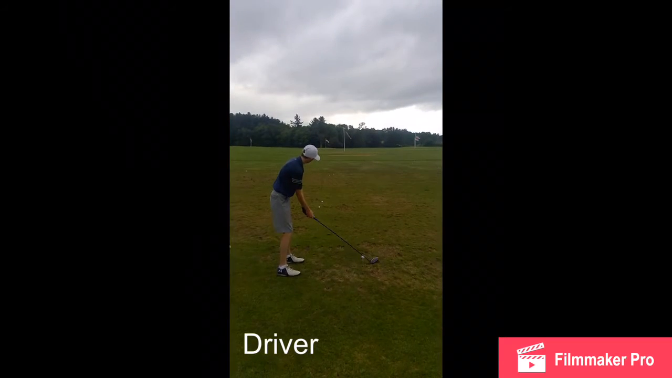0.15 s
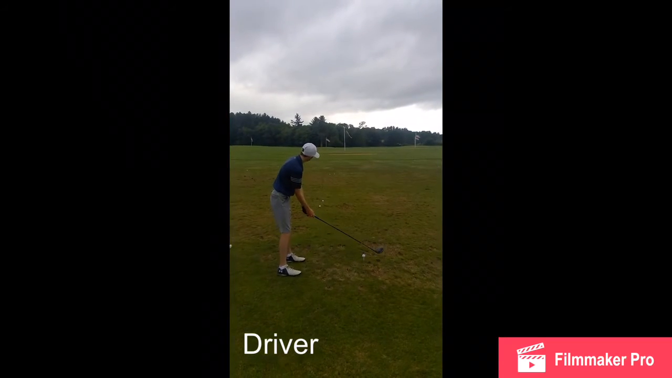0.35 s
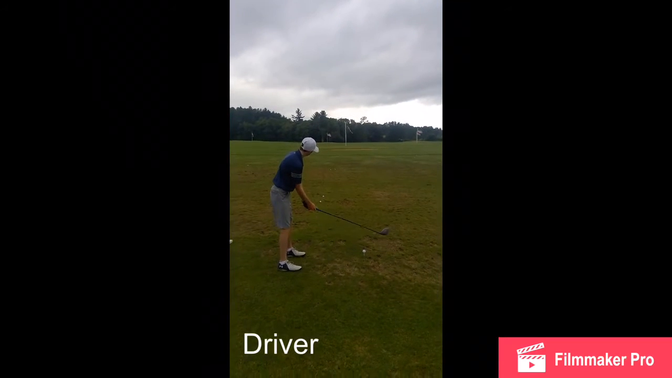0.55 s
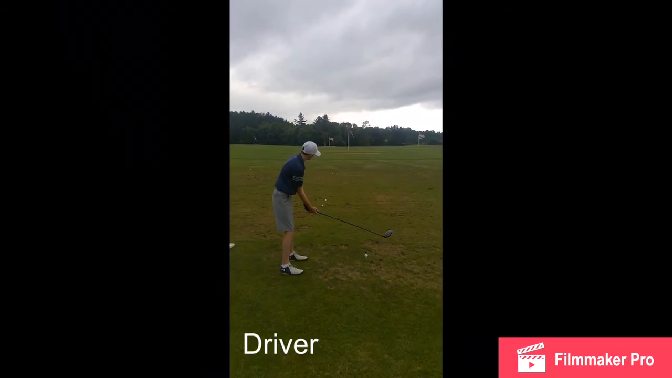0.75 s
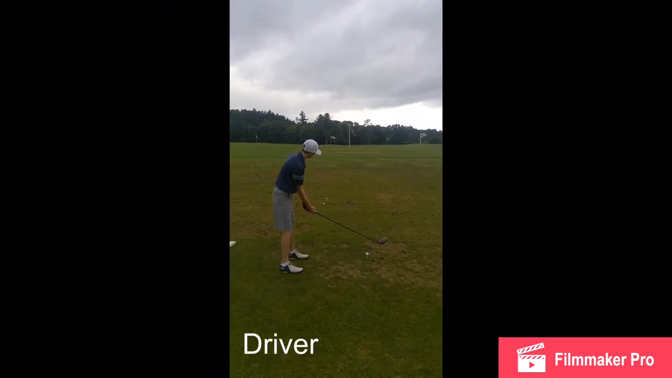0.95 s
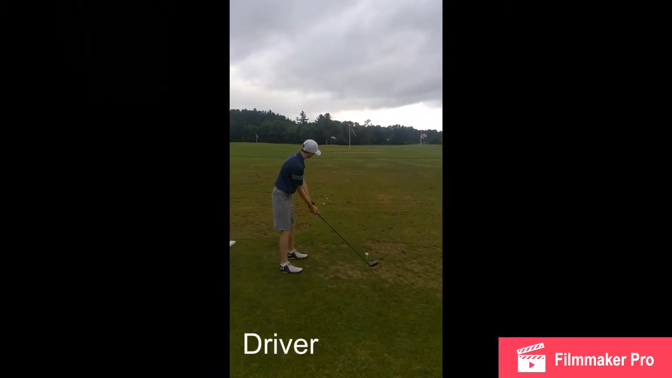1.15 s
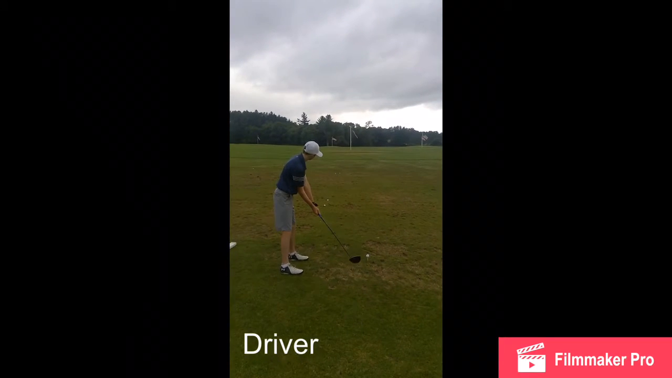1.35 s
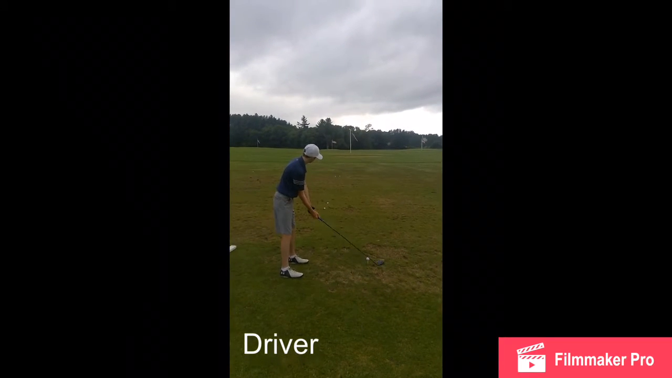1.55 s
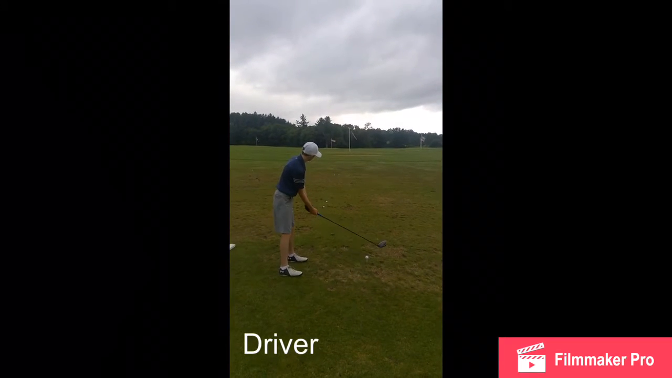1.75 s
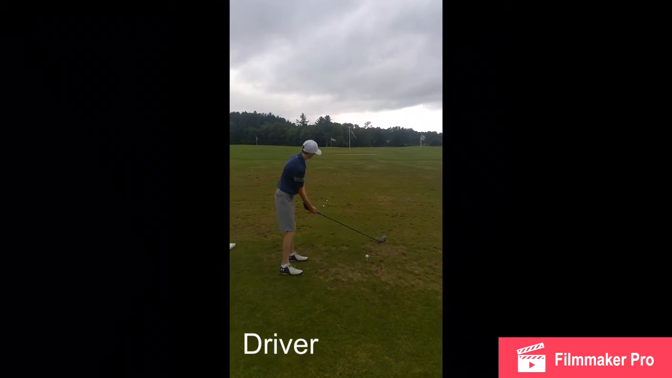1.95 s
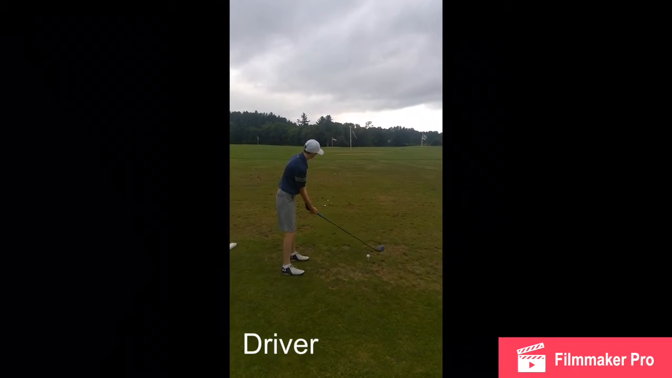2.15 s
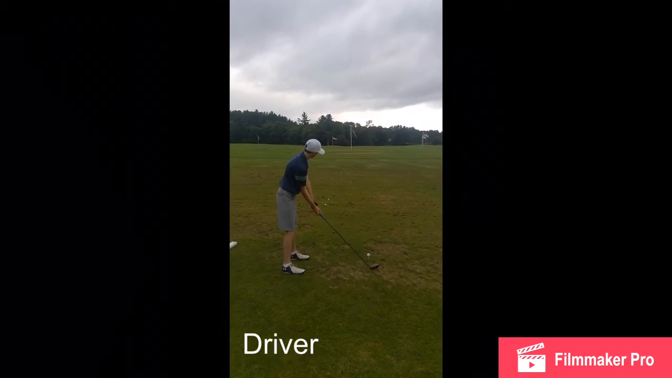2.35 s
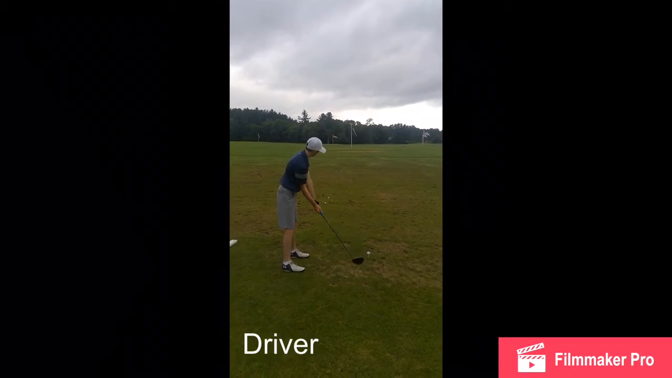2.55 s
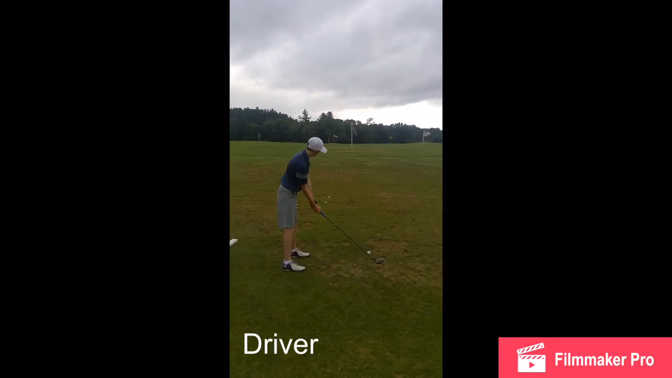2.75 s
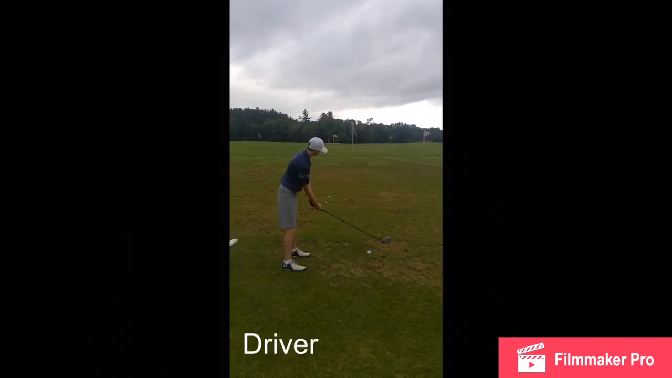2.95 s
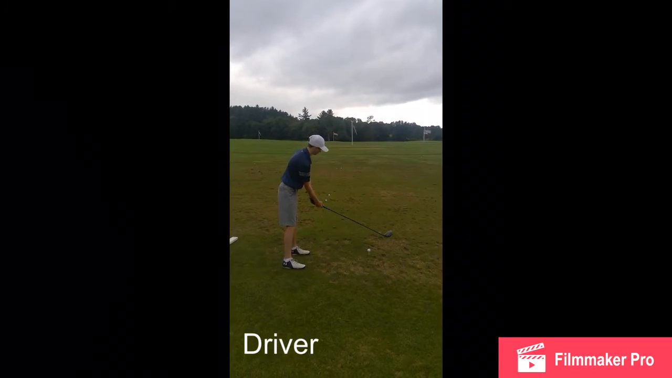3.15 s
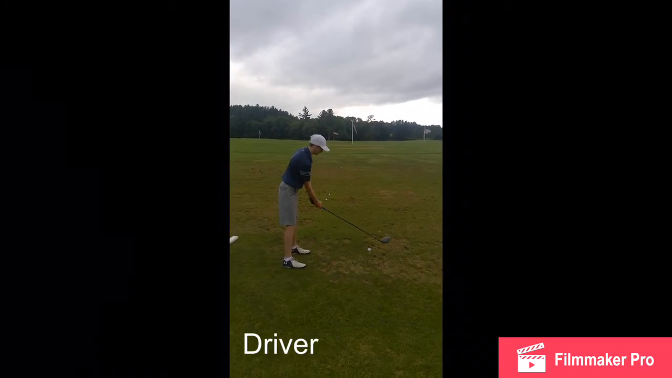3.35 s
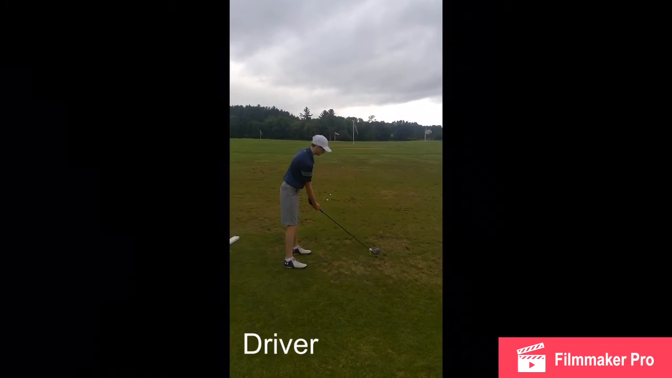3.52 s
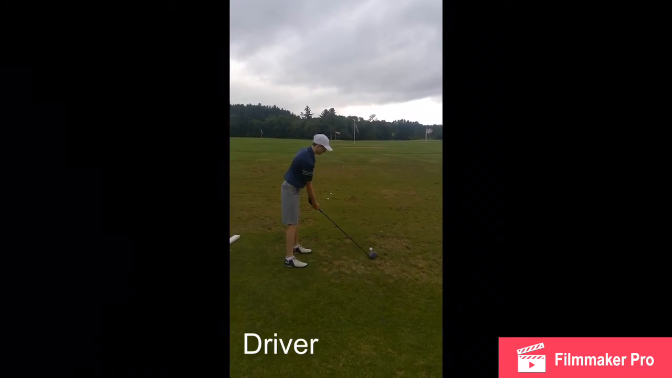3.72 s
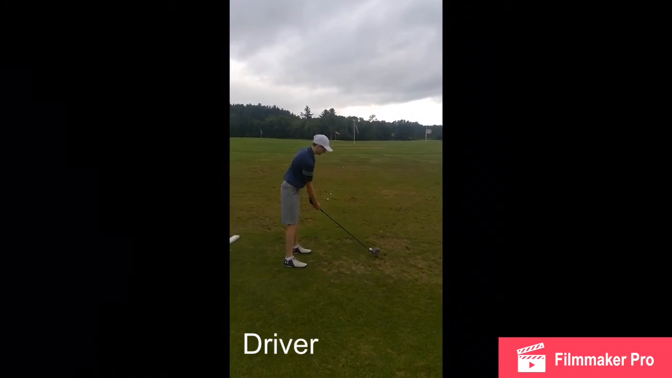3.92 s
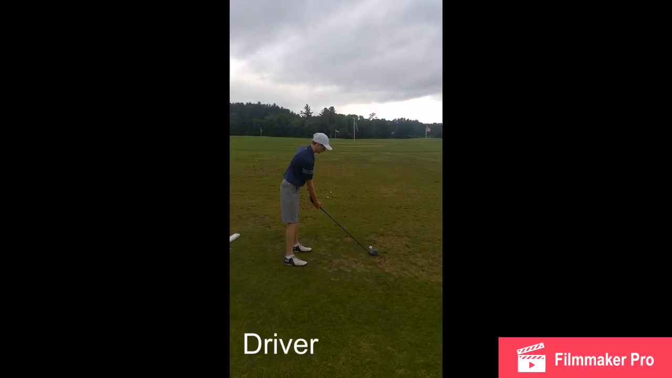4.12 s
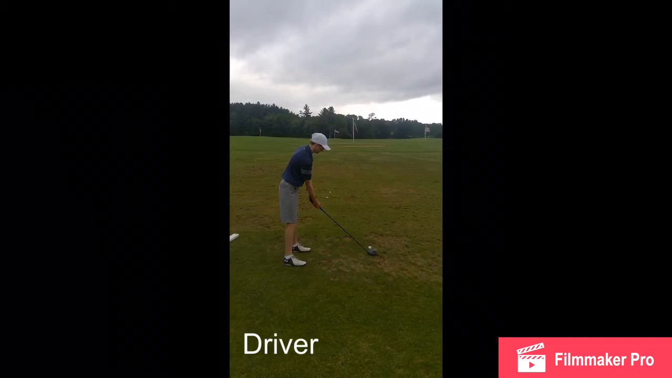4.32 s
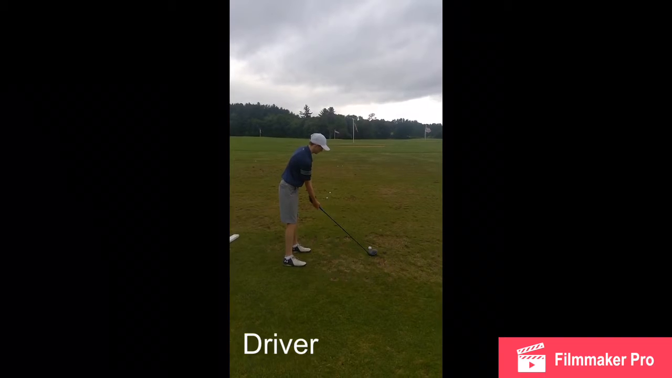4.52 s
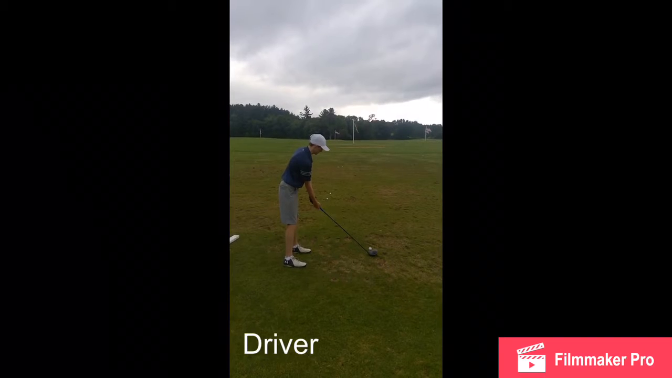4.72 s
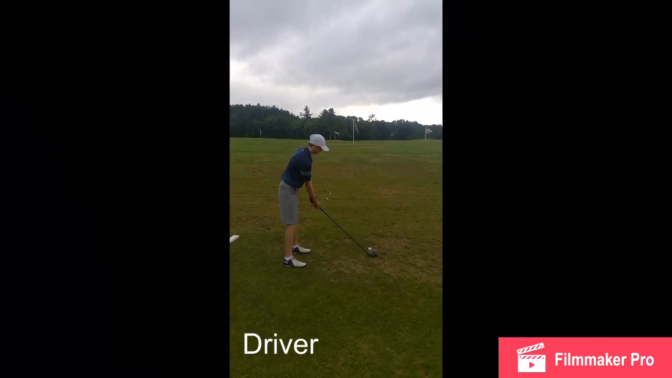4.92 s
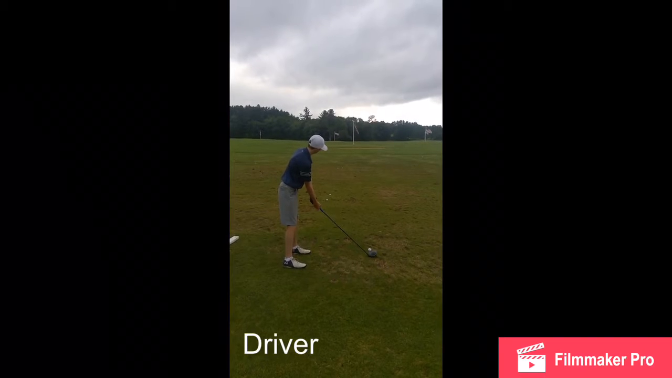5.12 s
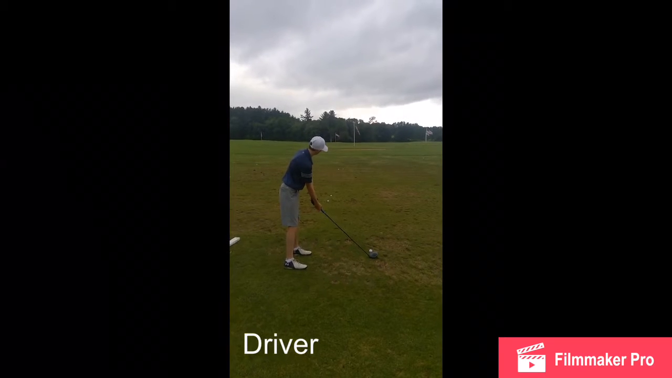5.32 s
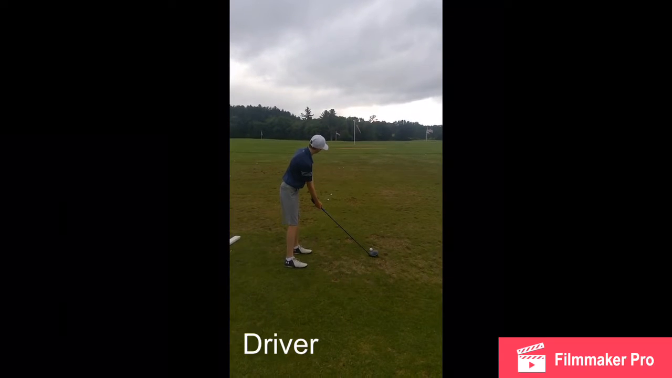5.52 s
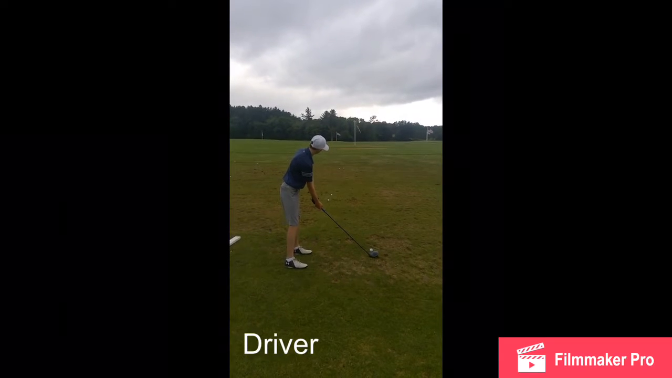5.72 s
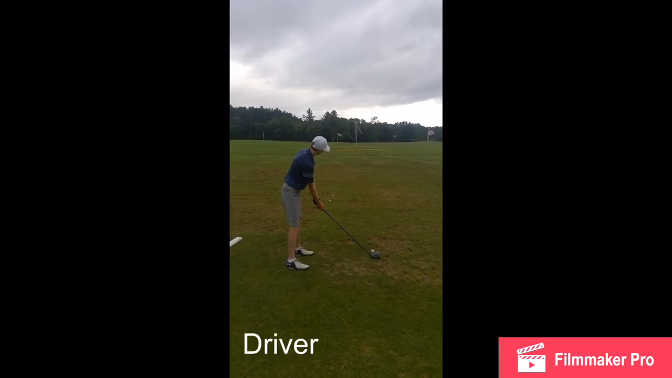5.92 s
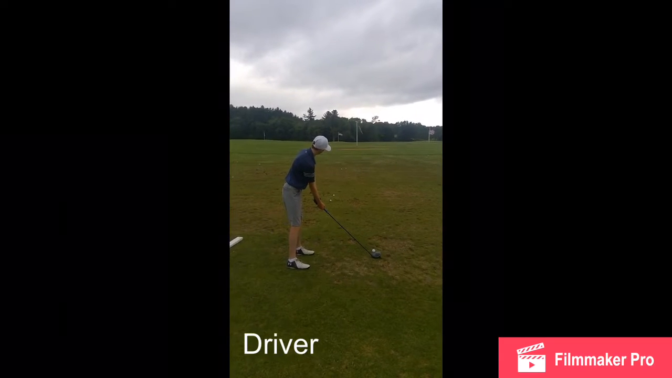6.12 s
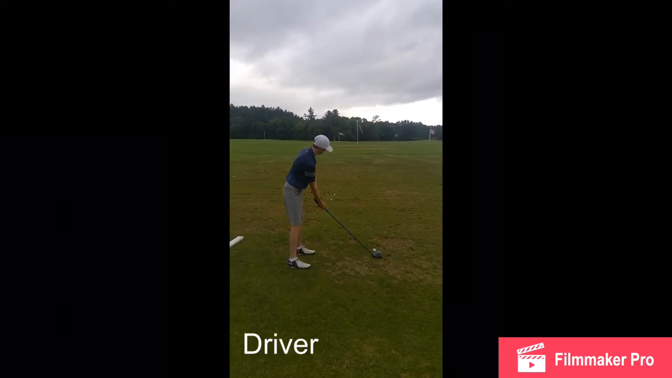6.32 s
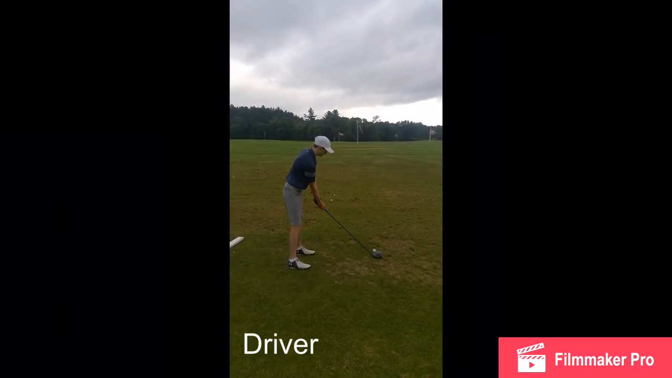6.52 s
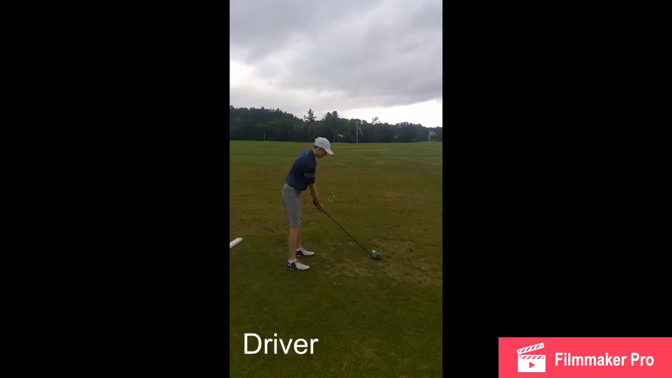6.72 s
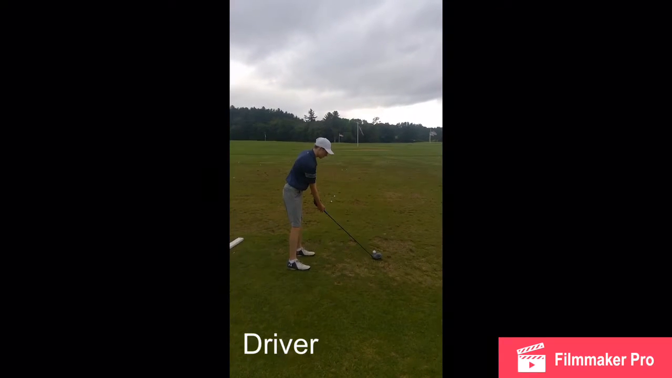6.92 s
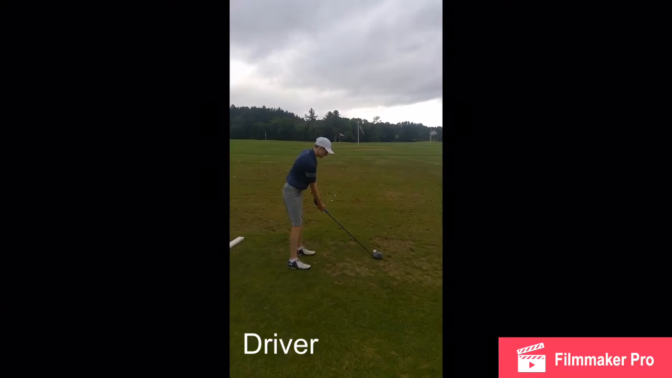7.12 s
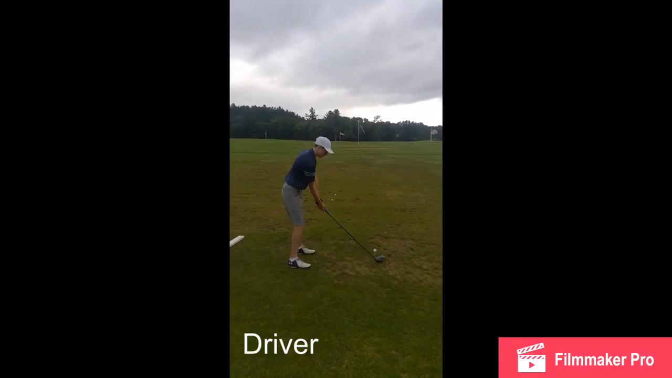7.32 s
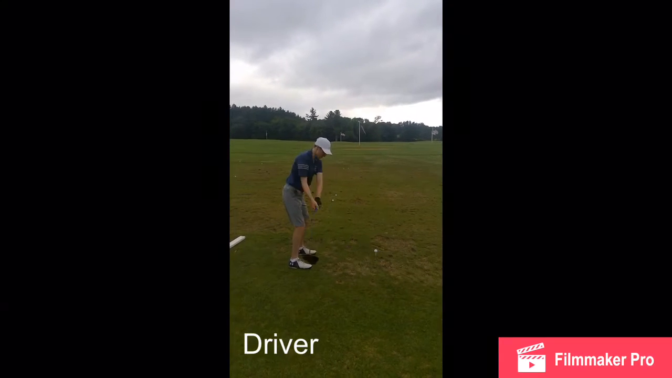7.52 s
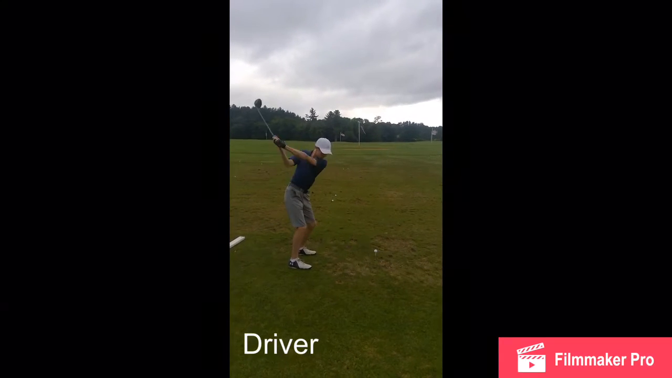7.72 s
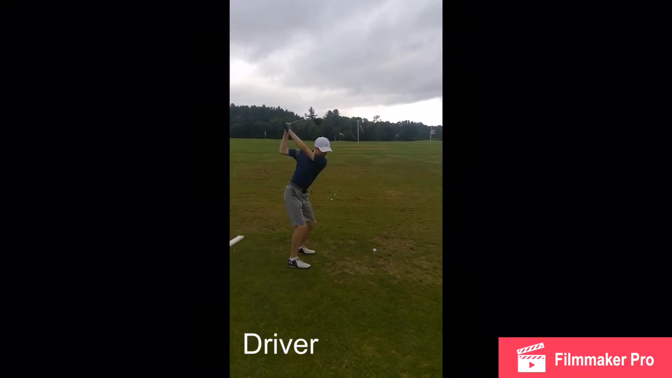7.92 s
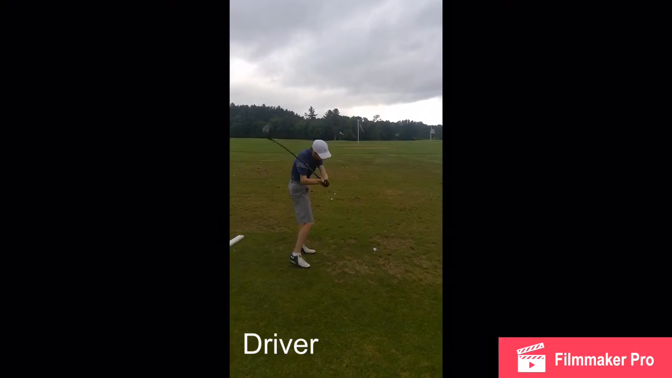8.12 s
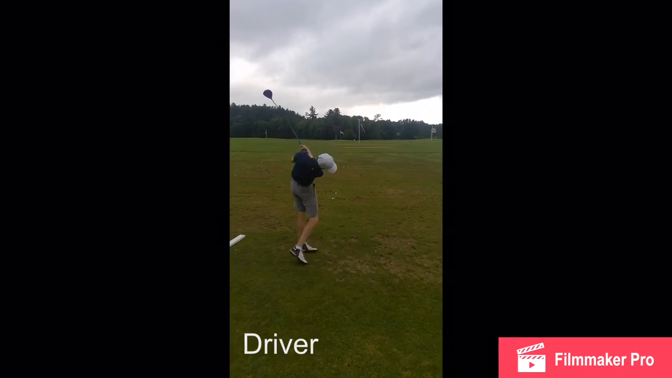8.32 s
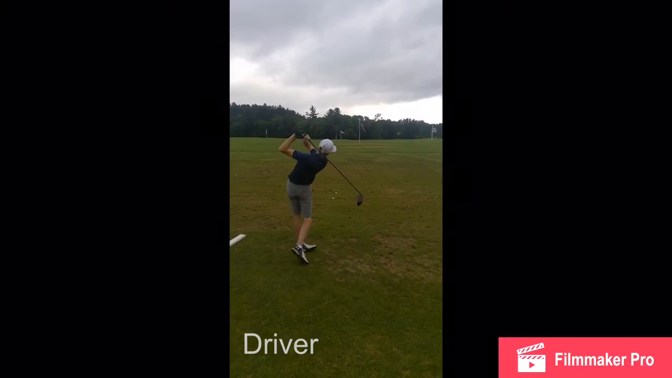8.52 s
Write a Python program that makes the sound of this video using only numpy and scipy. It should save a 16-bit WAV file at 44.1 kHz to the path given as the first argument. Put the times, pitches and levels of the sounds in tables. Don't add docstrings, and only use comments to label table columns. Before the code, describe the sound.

Breezy field air, small bird chirps and dull turf thuds for eight seconds, until a golf driver whooshes down and cracks hard against the ball.

```python
import sys
import numpy as np
from scipy import signal
from scipy.io import wavfile

SR = 44100
rng = np.random.default_rng(int(sys.argv[2]) if len(sys.argv) > 2 else 0)


def gain_from_db(level_db):
    decades = np.asarray(level_db, float) / 20
    return 10 ** decades


def generate_wav(signal):
    frames = np.transpose(np.atleast_2d(signal))
    scaled = np.clip(frames, -1, 1) * 32767
    pcm = np.round(scaled).astype(np.int16)
    wavfile.write(sys.argv[1], SR, pcm)


N = 377496
TIME = np.arange(N) / SR

# frequency in Hz, level in dB per Hz.
AIR_SPECTRUM = [(59, -33), (100, -9.5), (129, -13), (210, -2), (244, -10.5), (328, -12), (424, -12),
                (471, -19), (1010, -15.5), (1230, -19.5), (4020, -25.5), (6700, -35), (11000, -40.5),
                (16000, -54)]
# frequency in Hz, correlation from -1 to 1.
AIR_LIKENESS = [(60, 0.94), (130, -0.18), (290, 1), (640, 0.69), (1410, 0.2), (3100, 0.15), (6820, 0.6),
                (15000, 0.3)]
# time in seconds, level in dB.
TRAFFIC = [(0, -72.5), (.2, -68.5), (.7, -65), (1.24, -73), (2.5, -66.5), (2.95, -72), (3.74, -67.5),
           (4.07, -73), (4.65, -67.5), (5.0, -76.5), (5.29, -63), (5.6, -70), (6.5, -70), (7.4, -67),
           (7.75, -66.5), (8.56, -57)]
# peak in seconds, half length in seconds, level in dB,
# rumble over gust in dB, left minus right in dB.
BUFFETS = [(0.165, 0.28, -64, -23, -4), (1.576, 0.22, -56.5, 1, 0.5), (2.077, 0.17, -54.5, -2.5, -20.5),
           (4.14, 0.24, -67, -1, 1), (5.1, 0.25, -63.5, -19, 4.5), (5.557, 0.044, -59, -15.5, 9.5),
           (5.992, 0.2, -71.5, -7.5, 11.5), (7.156, 0.087, -67.5, 8.5, 7.5), (7.547, 0.1, -66.5, -12, -12),
           (8.226, 0.099, -55, 16.5, -9), (8.369, 0.18, -49.5, -0.5, 0.5)]
ENGINE_HZ, ENGINE_DB = 73.6, 7
BREEZE_DB, RUMBLE_DB, AIR_DB = -69.5, -7.5, -79.5

# start in seconds, length in seconds, frequency in Hz, slide in Hz, level in dB.
COOS = [(0.064, 0.017, 1476, 80, -78), (2.305, 0.043, 1696, -41, -72.5), (2.371, 0.056, 1725, -59, -75.5),
        (2.689, 0.072, 1531, 18, -71.5), (2.782, 0.071, 1836, -91.5, -81.5), (3.343, 0.024, 1525, 18, -76),
        (3.656, 0.01, 1570, 1.5, -72), (4.73, 0.087, 1703, -140, -76.5), (6.623, 0.039, 1724, -240, -79),
        (6.673, 0.053, 1440, 181, -74), (7.087, 0.03, 1172, -8, -72.5), (7.228, 0.032, 1897, -370, -62.5),
        (7.691, 0.04, 1185, -1, -77), (7.745, 0.032, 1403, 32.5, -74.5), (7.787, 0.039, 1520, 130, -70.5)]
# start in seconds, length in seconds, frequency in Hz, level in dB.
CHIPS = [(.94, 0.017, 4960, -82.5), (1.085, 0.017, 3980, -71), (1.781, 0.037, 4580, -62.5),
         (3.0, .011, 3580, -72.5), (3.48, .03, 5130, -83.5), (4.352, 0.018, 4850, -64.5),
         (4.553, .018, 3010, -76), (4.665, .014, 5680, -70), (4.667, 0.0087, 3610, -59.5),
         (4.74, 0.017, 5630, -70.5), (6.285, 0.037, 6820, -81), (6.442, 0.021, 4640, -57.5),
         (6.444, 0.02, 9200, -83), (8.152, 0.01, 3750, -52.5)]
# start in seconds, length in seconds, frequency in Hz, level in dB.
BUZZES = [
    (1.08, 0.035, 6700, -83.5),
    (2.201, 0.044, 5730, -82),
    (6.282, .067, 4480, -75.5),
]
# start in seconds, length in seconds, frequency in Hz, slide in Hz, level in dB.
STRANDS = [(1.097, .025, 5180, 99, -80.5), (1.102, 0.034, 6600, 2, -83), (1.133, 0.012, 4200, 599, -62.5),
           (2.255, 0.011, 4100, 798, -47.5), (4.403, 0.011, 4200, 749, -55),
           (6.342, 0.013, 4180, 749, -56.5), (3.94, 0.19, 5180, -180, -75),
           (3.941, 0.13, 4560, 148.5, -75.5), (3.944, 0.091, 5500, 59, -79.5),
           (4.006, 0.028, 6130, 0.5, -88), (4.212, .06, 6130, -78, -93), (4.26, 0.037, 4040, 299.5, -86.5),
           (7.001, .065, 4970, 0, -75), (7.04, 0.058, 4650, -120, -81.5), (7.06, 0.058, 5300, 0, -85),
           (7.06, 0.046, 4920, -49, -81.5), (7.218, .03, 4950, 120, -90), (4.83, 0.084, 2640, 50, -76)]
# start in seconds, length in seconds, frequency in Hz, level in dB.
PIPES = [
    (1.86, .027, 3590, -82),
    (2.731, 0.021, 6260, -74.5),
    (4.347, 0.026, 6070, -79),
]
# start in seconds, length in seconds, frequency in Hz,
# slide in Hz, level in dB.
SWOOPS = [(2.141, 0.2, 4210, 351.5, -72.5), (2.392, 0.064, 5090, 66, -74), (4.297, 0.046, 4330, -100, -86),
          (4.73, 0.047, 4410, 448, -65), (4.755, 0.053, 4520, -23.5, -68), (4.724, 0.063, 3950, 229, -64.5),
          (4.752, 0.034, 3020, 380.5, -57.5), (4.765, .06, 3317, -32, -55), (4.774, 0.071, 3114, -200, -55),
          (5.42, .05, 4160, -560, -90), (5.47, 0.069, 3620, -450, -84), (5.447, .035, 3250, -250, -85),
          (5.481, 0.043, 3000, -56.5, -79), (5.738, 0.057, 3190, -280, -81.5),
          (5.768, 0.045, 2840, -19, -77), (5.986, .03, 3460, -230, -79), (6.036, .045, 2885, -250, -86)]
# start in seconds, length in seconds, frequency in Hz, level in dB.
CHIRPS = [(2.29, 0.023, 2590, -78), (2.34, 0.048, 2600, -77.5), (2.38, 0.087, 3495, -57.5),
          (5.155, 0.067, 2960, -85), (5.794, .013, 2350, -73), (5.85, .025, 3400, -86),
          (5.895, .032, 3000, -80), (6.03, 0.023, 3400, -83), (7.36, .075, 3500, -81.5),
          (7.79, 0.049, 3500, -83)]
# start in seconds, length in seconds, frequency in Hz, level in dB.
INSECT = [(2.551, 0.52, 11380, -96.5)]
# time in seconds, frequency in Hz, level in dB.
GLIDE = [
    (6.481, 3700, -74),
    (6.66, 3940, -76.5),
    (6.714, 4164, -64.5),
    (6.755, 4410, -68.5),
    (6.79, 4350, -69),
    (6.829, 4300, -90),
]
COO_BUZZ_HZ, SWOOP_BUZZ_HZ, STRAND_BUZZ_HZ = 21.3, 90, 150

# start in seconds, level in dB, pitch factor, left minus right in dB,
# level of the last strokes in dB.
CALLS = [
    (1.1, -54.5, 1.008, 13.5, 4.5),
    (2.222, -50, 1.032, 13, -3),
    (4.363, -58, 1.017, 18, -5),
    (6.312, -57.5, 1.027, 15.5, -3),
]
# start in seconds, length in seconds, start Hz, end Hz, level in dB.
STROKES = [
    (0, .04, 3520, 4020, 0),
    (0.041, .032, 3800, 3280, -0.5),
    (0.081, .036, 2858, 3200, -5.5),
    (.09, .014, 3300, 3800, -8),
    (0.113, .03, 2640, 3000, -13.5),
]
STROKE_EASE, STROKE_ROUND = 1.7, .8
STEP_HZ = -71.5

# frequency in Hz, level in dB, 60 dB decay in seconds.
KNOCK_MODES = [(1315, 8, 0.011), (1046, -7.5, 0.021)]
# start in seconds, peak in dB, left minus right in dB.
KNOCKS = [
    (1.449, -43.5, 11),
    (1.451, -40.5, -12),
    (1.508, -38, -6.5),
    (2.004, -73, -23),
    (7.117, -73.5, 10.5),
]
# start in seconds, peak in dB, frequency in Hz,
# left minus right in dB.
SLAPS = [
    (1.482, -56, 1320, 25.5),
    (1.542, -50.5, 1400, 18),
]
# frequency in Hz, level in dB.
IRON_MODES = [(2170, -4.5), (3400, 3), (4310, -3), (5080, -7.5), (5650, -2.5), (6900, -4), (7900, 2.5),
              (9270, -8.5), (11200, -10.5), (12500, -16), (13500, -16)]
# start in seconds, peak in dB, tilt in dB per octave, left minus
# right in dB.
IRONS = [(1.4512, -34.5, 0.5, -12), (1.462, -55.5, -4, 6), (1.509, -32.5, 0.5, -4), (1.521, -58, -6, 3),
         (2.004, -76, -8.5, -23), (2.026, -75, -9, -17.5), (7.119, -81, -11.5, 6.5), (7.141, -79.5, -6, 11)]
# frequency in Hz, level in dB.
WEDGE_MODES = [(2360, 1), (2980, -0.5), (3590, 3), (4370, 2.5), (5710, 4.5), (6800, 3.5), (7900, 1.5),
               (8300, -2), (9200, 1), (10200, -6), (11400, -9), (12700, -16)]
# start in seconds, peak in dB, tilt in dB per octave, left minus right in dB.
WEDGES = [
    (3.088, -66, -6, -1),
    (3.096, -45, 0.5, -11.5),
    (3.106, -63, -9, 2),
]
# frequency in Hz, level in dB.
CLINK_MODES = [(7050, -2), (8600, -5.5), (10200, -0.5), (11900, -6.5), (12600, 4), (14000, -12)]
# start in seconds, peak in dB, tilt in dB per octave, left minus right in dB.
CLINKS = [(1.944, -69.5, -35, -18), (3.582, -71.5, -0.5, -21), (3.624, -69, 9.5, -23),
          (3.658, -64, 11, -30.5), (4.573, -56, 3, -20), (5.738, -66, 17, -21), (5.778, -64, -12, -20),
          (5.802, -74.5, -14, -19), (6.633, -74, 0, -6), (2.24, -82, 0, 0), (2.45, -82, 5, 0),
          (2.55, -84, 5, -0.5), (2.84, -81.5, 7.5, -2), (4.11, -83, 5, 2), (5.68, -81.5, 7.5, -1),
          (7.32, -81.5, 0, 1)]
IRON_T60_S, CLINK_T60_S = .011, .016
UNEVEN_DB, DETUNE = 1.5, .006

# start in seconds, peak in dB,
# frequency in Hz, puff in dB, left minus right in dB.
THUDS = [(1.449, -49.5, 322, 8, 1), (2.009, -40, 135, -31.5, -25.5), (2.062, -42.5, 118, -52, -23.5),
         (3.564, -66.5, 424, 0.5, -4), (3.595, -53, 170, -20.5, 2), (4.108, -54.5, 300, -2, -4.5),
         (4.124, -58, 520, -6.5, 2), (4.14, -56.5, 570, -14, 5), (4.153, -50.5, 210, -21, 6),
         (4.201, -55, 335, -21, 2.5), (4.753, -48.5, 271, -37, 3), (5.238, -44, 236, -37, -24),
         (5.417, -53.5, 118, -41, 23), (5.458, -65.5, 173, -6, 8.5), (5.738, -51, 119, -32, -16),
         (7.121, -40, 205, -37, 21), (7.138, -52, 150, -20, 10)]

STRIKE_S, SWING_S = 8.2043, .135
SHED_HZ, SHED_SAG_HZ_PER_S2 = 791, 23000
WHOOSH_DB, WHOOSH_SAG_DB_PER_S2 = -37, 3501
HISS_DB, HISS_SAG_DB_PER_S2 = -48, 4498.5
HISS_SHADE_S, HISS_SHADE_DB = 0.019, -13.5

# frequency in Hz, level in dB, 60 dB decay in seconds.
HEAD_MODES = [(3500, -27, 0.08), (3996, -10, 0.059), (4200, -13, .05), (4640, -10.5, 0.029),
              (5560, -7.5, 0.036), (6080, 0, 0.03), (6055, 1.5, 0.041), (6360, -15, 0.068),
              (6970, -13, .038), (8020, -9, 0.044), (8250, -16.5, .05), (9700, -21, 0.024),
              (11600, -20.5, .04), (13050, -11, .025)]
# frequency in Hz, left minus right in dB.
HEAD_SIDE = [(3000, -3.5), (4000, -13), (5400, -9.5), (6100, -1.5), (7900, -12), (12000, -1)]
# frequency in Hz, level in dB, 60 dB decay in seconds.
BALL_MODES = [(376, -13, 0.03), (814, -10, 0.027), (1093, -9, 0.0067), (1515, -25, 0.077),
              (2580, -7, 0.016)]
# frequency in Hz, level in dB per Hz.
CRACK_SPECTRUM = [(88, -36), (150, -13.5), (1660, -5.5), (2310, -10), (3620, -17), (3920, -4), (5150, -5),
                  (5910, -1.5), (9000, -16), (13000, -17.5), (16000, -24)]
# delay in seconds, level in dB, upper edge in Hz, left minus right in dB.
ECHOES = [
    (0.0514, -15, 1500, 4),
    (0.0524, -15, 1800, 9.5),
    (.0535, -12.5, 2000, 10.5),
    (.051, -32, 15200, 20),
    (.057, -56, 11000, 11),
    (.062, -31.5, 10700, 23),
]
# frequency in Hz, level in dB per Hz.
SCATTER_SPECTRUM = [(59, -34), (100, -12.5), (283, -5.5), (502, -8), (621, -9.5), (1250, -3.5),
                    (2630, -13.5), (3600, -20.5), (3940, -20.5), (4290, -16.5), (6150, -14.5), (7450, -13),
                    (16000, -25.5)]
# frequency in Hz, 60 dB decay in seconds.
SCATTER_T60 = [(100, 0.23), (700, 0.45), (2000, 0.37), (3000, 0.32), (4000, 0.48), (6000, 0.52),
               (9000, 0.37), (16000, .36)]
# frequency in Hz, width in Hz, level in dB,
# 60 dB decay in seconds.
HANGING_RING = [(4000, 70, -37, 0.42), (4690, 90, -47, .6), (5540, 110, -38.5, .45),
                (6160, 64, -39.5, 0.44), (6260, 100, -44, .6), (7100, 83, -49, 0.3), (8100, 55, -58, 0.35)]
CONTACT_S, PUSH = .00036, 1.5
PORT_LAG = 2
RING_FROM_DB, RING_TO_DB, RING_SWING_S = 10.5, -6, 0.0029
RING_DB, SHADED_AT_S, SHADE_S, SHADE_DB = 3.5, .034, .006, -10.5
BLOOM_DB, BLOOM_S = -10, .0055


def rms_one(x):
    return x / np.sqrt(np.mean(x ** 2) + 1e-20)


def at_hz(points, hz):
    points = np.array(points)
    return np.interp(np.log(hz), np.log(points[:, 0]), points[:, 1])


def band(x, low_hz, high_hz, order=2):
    edges = [low_hz, min(high_hz, .45 * SR)]
    return signal.sosfilt(signal.butter(order, edges, "band", fs=SR, output="sos"), x)


def pan(x, db):
    return x * gain_from_db(np.array([[db / 2], [-db / 2]]))


def add(out, x, s):
    i = round(s * SR)
    out[:, i:i + x.shape[1]] += x[:, :N - i]


def dying(length, t60):
    return gain_from_db(-60 * np.arange(length) / SR / t60)


def bank(length, spectrum, likeness, t60s=None):
    out = 0
    edges = 90 * 2 ** (np.arange(24) / 3)
    white = rng.standard_normal((2, 2, length))
    for k, (low, high) in enumerate(zip(edges, edges[1:])):
        mid, side = band(white[k % 2], low, high)
        hz = np.sqrt(low * high)
        alike = np.clip(at_hz(likeness, hz), -1, 1)
        noise = np.sqrt(1 + alike) * mid + np.sqrt(1 - alike) * side * [[1], [-1]]
        decay = dying(length, at_hz(t60s, hz)) if t60s else 1
        out = out + gain_from_db(at_hz(spectrum, hz)) * noise * decay
    return out


def ring(modes, length, face_s=0):
    t = np.arange(length) / SR
    hz, db, t60 = np.transpose(modes)[:, :, None]
    rise = 1 - np.exp(-t / (face_s + 1e-5))
    return gain_from_db(db - 60 * t / t60) * np.sin(2 * np.pi * hz * t) * rise


def trees(x, wet_db, t60, lumpy_db, top_hz=9000):
    length = int(.6 * SR)
    lumps = np.repeat(rng.standard_normal((2, length // 100 + 1)), 100, axis=1)[:, :length]
    tail = band(rng.standard_normal((2, length)), 370, top_hz, order=1)
    tail = tail * dying(length, t60) * gain_from_db(lumpy_db * lumps)
    tail = tail * np.clip(np.arange(length) / SR / 0.01, 0, 1)
    tail = rms_one(tail) / np.sqrt(length)
    return x + gain_from_db(wet_db) * signal.fftconvolve(x, tail, axes=1)[:, :x.shape[1]]


def background():
    noise = rng.standard_normal((7, N))
    gust = rms_one(band(noise[0] + 3.3 * noise[1:3], 18, 60))
    engine_hz = ENGINE_HZ + 4.1 * rms_one(band(noise[3], 2.5, 15, order=1))
    engine = gain_from_db(ENGINE_DB) * np.sin(2 * np.pi * np.cumsum(engine_hz) / SR)
    rumble = rms_one(band(noise[4] + .5 * noise[5:], 55, 140))
    traffic = gain_from_db(np.interp(TIME, *np.transpose(TRAFFIC)) + RUMBLE_DB)
    gusting, rumbling = gain_from_db(BREEZE_DB), traffic
    for s, half_s, db, rumble_db, side_db in BUFFETS:
        shape = np.cos(np.pi / 2 * np.clip((TIME - s) / half_s, -1, 1)) ** 2
        swell = pan(gain_from_db(db) * shape, side_db)
        gusting = gusting + swell
        rumbling = rumbling + gain_from_db(rumble_db + RUMBLE_DB) * swell
    air = gain_from_db(AIR_DB) * rms_one(bank(N, AIR_SPECTRUM, AIR_LIKENESS))
    return gusting * gust + rumbling * rumble + traffic * engine + air


def notes():
    rows = []
    for table, buzz_hz in [(COOS, COO_BUZZ_HZ), (SWOOPS, SWOOP_BUZZ_HZ), (STRANDS, STRAND_BUZZ_HZ)]:
        rows += [(s, length, hz, hz + slide_hz, db, buzz_hz) for s, length, hz, slide_hz, db in table]
    # slide in Hz per s, buzz in Hz
    habits = [(CHIRPS, -3300, 31), (CHIPS, -4500, 64), (PIPES, 3600, 23), (BUZZES, -900, 270), (INSECT, 240, 4.4)]
    for table, slide, buzz_hz in habits:
        rows += [(s, length, hz, hz + slide * length, db, buzz_hz) for s, length, hz, db in table]
    return rows


def whistle(rows):
    s, hz, db = np.transpose(rows)
    t = np.arange(s[0], s[-1], 1 / SR)
    edge = np.clip(np.minimum(t - s[0], s[-1] - t) / 0.0033, 0, 1)
    tone = np.sin(2 * np.pi * np.cumsum(np.interp(t, s, hz)) / SR)
    return np.sqrt(2) * edge * gain_from_db(np.interp(t, s, db)) * tone


def birds():
    out = np.zeros((2, N))
    add(out, pan(whistle(GLIDE), -14.0), GLIDE[0][0])
    for start, ratio, db in [(1, 3 / 2, -27), (2, 2, -25)]:
        overtone = whistle(np.array(GLIDE[start:]) * [1, ratio, 1])
        add(out, pan(gain_from_db(db) * overtone, -7.5), GLIDE[start][0])
    rows = notes()
    chance = rng.standard_normal((len(rows), 80))
    for (s, length, start_hz, end_hz, db, buzz_hz), (side, *flutter) in zip(rows, chance):
        t = np.arange(int(length * SR)) / SR
        uneven = np.interp(t / 0.0023, np.arange(79), flutter)
        buzz_phase = 2 * np.pi * np.cumsum(buzz_hz * (1 + .25 * uneven)) / SR
        buzz = 1 + min(buzz_hz / 250, 1.3) * np.cos(buzz_phase)
        hz = start_hz + (end_hz - start_hz) * t / length + .25 * buzz_hz * uneven[::-1]
        swell = np.sin(np.pi * (t / length) ** 0.8) ** 1.1
        note = gain_from_db(db + 4.16 * uneven) * buzz * swell * np.sin(2 * np.pi * np.cumsum(hz) / SR)
        add(out, pan(note, 3 * side), s)
    return trees(out, -6.0, .3, 4.5)


def calls():
    out = np.zeros((2, N))
    for s, db, pitch, side_db, last_db in CALLS:
        call = np.zeros((2, SR))
        for start, length, start_hz, end_hz, stroke_db in STROKES:
            u = np.arange(int(length * SR)) / (length * SR)
            hz = pitch * (end_hz + (start_hz - end_hz) * (1 - u) ** STROKE_EASE)
            hz = hz + STEP_HZ * np.sin(4 * np.pi * u) * (start_hz > end_hz)
            swell = np.sqrt(2) * np.sin(np.pi * u) ** STROKE_ROUND
            tone = swell * np.sin(2 * np.pi * np.cumsum(hz) / SR)
            level_db = db + stroke_db + last_db * (start > .07)
            add(call, pan(gain_from_db(level_db) * tone, side_db), start)
        add(out, trees(call, -3, .34, 6.5, top_hz=2500), s)
    return out


def struck(modes, rows, middle_hz, t60, face_s, grit_db):
    out, length = np.zeros((2, 2, N)), int(0.041 * SR)
    hz, level_db = np.transpose(modes)
    rise = 1 - np.exp(-np.arange(length) / SR / face_s)
    for s, db, tilt_db, side_db in rows:
        uneven, off = rng.standard_normal((2, len(modes)))
        strengths = level_db + tilt_db * np.log2(hz / middle_hz) + UNEVEN_DB * uneven
        blow_modes = np.transpose([hz * (1 + DETUNE * off), strengths, t60 + 0 * hz])
        rings = ring(blow_modes, length, face_s).T @ np.sign(off)
        grit = band(rng.standard_normal(length), 0.85 * hz[0], 0.99 * hz[-1], order=4)
        grit = grit * (dying(length, 0.00998) + gain_from_db(-13.5) * dying(length, 0.044))
        add(out[0], pan(gain_from_db(db) * rings, side_db), s)
        add(out[1], pan(gain_from_db(db + grit_db) * grit * rise, side_db), s)
    return out


def ticks():
    knocks = np.zeros((2, N))
    knock = ring(KNOCK_MODES, int(0.035 * SR), face_s=0.00017).sum(axis=0)
    for s, db, side_db in KNOCKS:
        add(knocks, pan(gain_from_db(db - 0.5) * knock, side_db), s)
    for s, db, hz, side_db in SLAPS:
        slap = ring([(hz, 6, .022)], len(knock), face_s=.003)[0]
        add(knocks, pan(gain_from_db(db) * slap, side_db), s)
    irons = struck(IRON_MODES, IRONS, 4900, IRON_T60_S, face_s=.0003, grit_db=-0.5)
    wedges = struck(WEDGE_MODES, WEDGES, 5100, IRON_T60_S, face_s=0.00074, grit_db=-1.0)
    clinks = struck(CLINK_MODES, CLINKS, 9430, CLINK_T60_S, face_s=0.0017, grit_db=0.0)
    rings, grit = irons + wedges + clinks
    sent = grit + gain_from_db(-12) * rings + gain_from_db(-9.5) * knocks
    return knocks + rings + grit - sent + trees(sent, -10, 0.33, 3.3)


def thuds():
    out, length = np.zeros((2, N)), int(.15 * SR)
    for s, db, hz, puff_db, side_db in THUDS:
        cycles = np.arange(length) / SR * hz
        push = 1.95 * cycles ** 2 * np.exp(-1.5 * cycles) * np.sin(2 * np.pi * cycles)
        noise = 4.5 * rng.standard_normal(length) * dying(length, .04)
        puff = gain_from_db(puff_db) * band(noise, 350, 1250, order=4)
        add(out, pan(gain_from_db(db) * (push + puff), side_db), s)
    return out


def swing():
    t = TIME[(TIME > STRIKE_S - SWING_S) & (TIME < STRIKE_S)]
    left = STRIKE_S - t
    lowpass = signal.butter(2, 120, fs=SR, output="sos")
    wobble = signal.sosfilt(lowpass, rng.standard_normal((2, len(t))))
    phase = 2 * np.pi * np.cumsum(SHED_HZ - SHED_SAG_HZ_PER_S2 * left ** 2) / SR
    shed = rms_one(wobble[0] * np.cos(phase) + wobble[1] * np.sin(phase))
    hum = shed + .5 * rms_one(band(rng.standard_normal(len(t)), 180, 980))
    hum_db = WHOOSH_DB - WHOOSH_SAG_DB_PER_S2 * left ** 2
    hiss = rms_one(band(rng.standard_normal((2, len(t))), 1500, 11000, order=1))
    shade_db = HISS_SHADE_DB * np.clip(1 - left / HISS_SHADE_S, 0, 1)
    hiss_db = HISS_DB - HISS_SAG_DB_PER_S2 * left ** 2 + shade_db
    out = np.zeros((2, N))
    add(out, pan(gain_from_db(hum_db) * hum, 4.2) + gain_from_db(hiss_db) * hiss, t[0])
    return out


def head_shell(t):
    side = at_hz(HEAD_SIDE, np.array(HEAD_MODES)[:, 0])
    shell = gain_from_db(-3.0) * gain_from_db(np.outer([.5, -.5], side)) @ ring(HEAD_MODES, len(t), face_s=0.00017)
    swung_db = RING_TO_DB + (RING_FROM_DB - RING_TO_DB) * np.exp(-t / RING_SWING_S)
    shade_db = SHADE_DB * np.clip((t - SHADED_AT_S) / SHADE_S, 0, 1)
    level_db = RING_DB + BLOOM_DB * np.exp(-t / BLOOM_S) + shade_db
    return shell * gain_from_db(level_db + swung_db * [[.5], [-.5]])


def tree_line(out, t):
    length = len(t)
    scatter = bank(length, SCATTER_SPECTRUM, [(200, 0.94), (1000, 0.15), (8000, 0.083)], SCATTER_T60)
    swell = np.clip((t - .035) / 0.019, .25, 1)
    trunks = t[::150]
    lumps = gain_from_db(2.5 * np.interp(t, trunks, rng.standard_normal(len(trunks))))
    add(out, gain_from_db(-32.5) * rms_one(scatter) * swell * lumps * gain_from_db([[1.5], [-1.5]]), STRIKE_S)
    for hz, width_hz, db, t60 in HANGING_RING:
        noise = rng.standard_normal((2, length))
        line = rms_one(band(noise, hz - width_hz / 2, hz + width_hz / 2))
        line = line * dying(length, t60) * np.clip(t / 0.017, 0, 1)
        add(out, gain_from_db(db) * line, STRIKE_S + 0.035)


def strike():
    out, length = np.zeros((2, N)), int(.4 * SR)
    t = np.arange(length) / SR
    shell = head_shell(t)
    step = PUSH * np.sin(np.pi * np.clip(t / CONTACT_S, 0, 1)) ** 2
    ball = pan(ring(BALL_MODES, length).sum(axis=0), 3.6)
    crack = rms_one(bank(length, CRACK_SPECTRUM, [(200, 0.077), (2000, -0.21), (8000, -.2)]))
    crack = crack * (gain_from_db(5.5) * dying(length, 0.02) + gain_from_db(-20) * dying(length, 0.15))
    push = step + ball
    push[0] = np.roll(push[0], PORT_LAG)
    shell[0] = np.roll(shell[0], PORT_LAG)
    released = np.clip(t / CONTACT_S - .6, 0, 1)
    blow = push + (shell + crack) * released
    blow = band(blow, 320, 22000, order=1)
    add(out, blow, STRIKE_S)
    for delay, db, top_hz, side_db in ECHOES:
        heard = step + .4 * ball if top_hz < 3000 else blow
        echo = band(heard.mean(axis=0), 320, top_hz)
        add(out, gain_from_db(db) * pan(echo, side_db), STRIKE_S + delay)
    tree_line(out, t)
    return out


def scene():
    return background() + birds() + calls() + ticks() + thuds() + swing() + strike()


def roll_off(x):
    return signal.sosfilt(signal.butter(12, 16720, fs=SR, output="sos"), x)


def record(dry):
    held = .76 * np.tanh(dry / .76)
    lowpass = signal.ellip(8, .5, 60, 16100, fs=SR, output="sos")
    mix = signal.sosfilt(lowpass, held)
    return roll_off(mix)


dry = scene()
out = record(dry)
generate_wav(out)
```